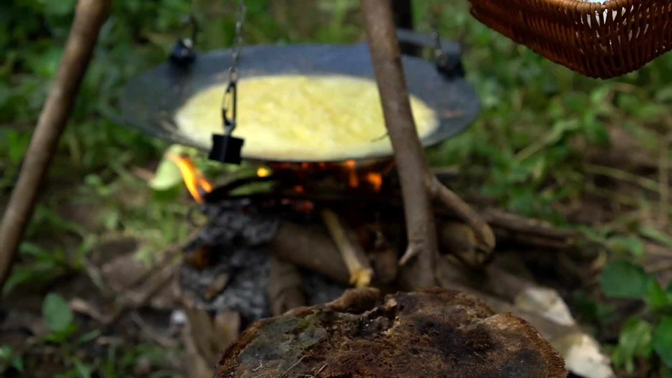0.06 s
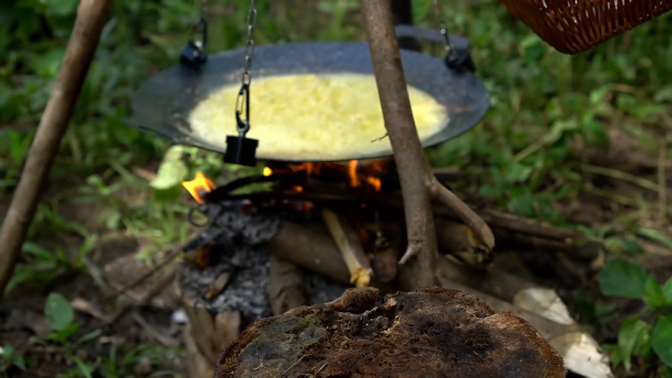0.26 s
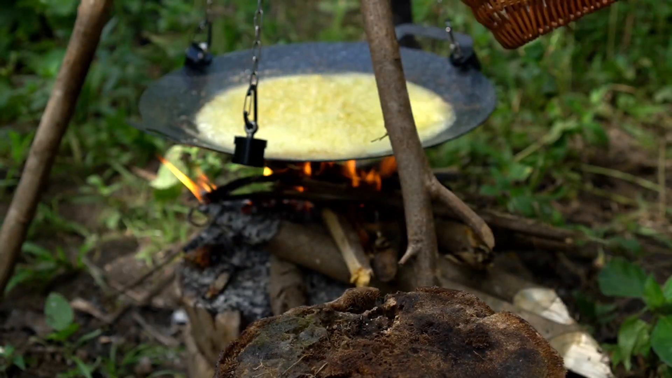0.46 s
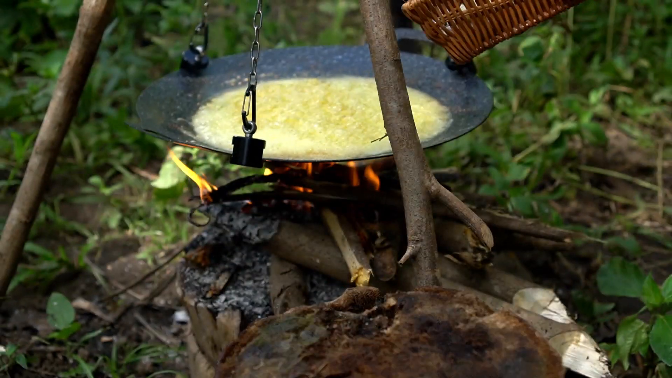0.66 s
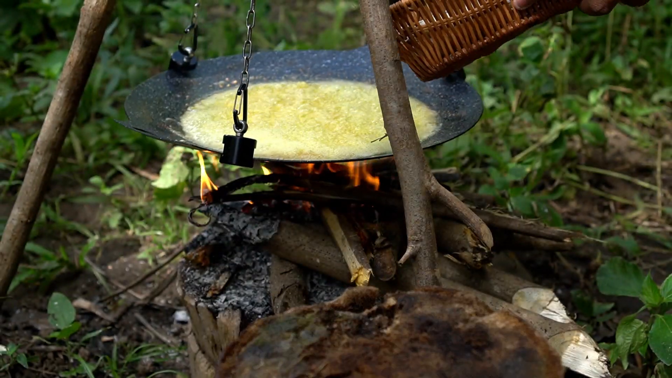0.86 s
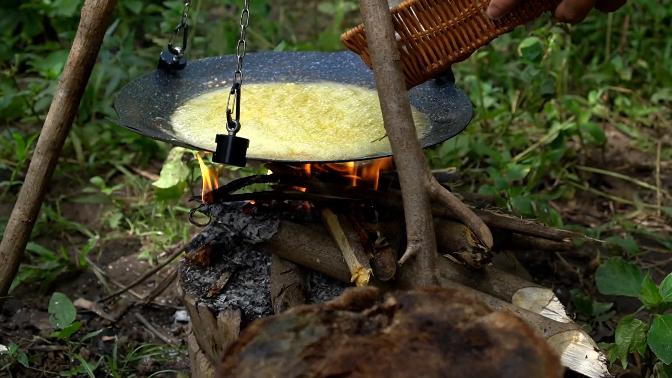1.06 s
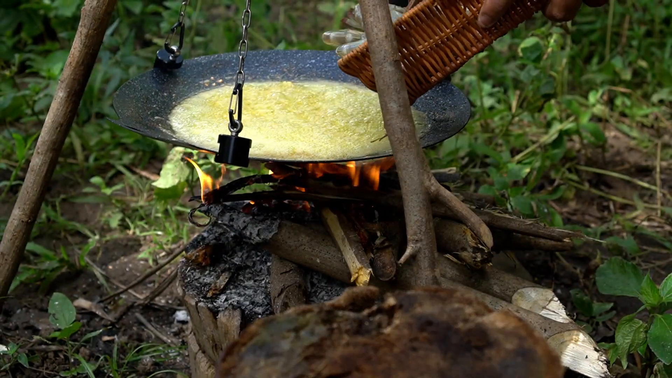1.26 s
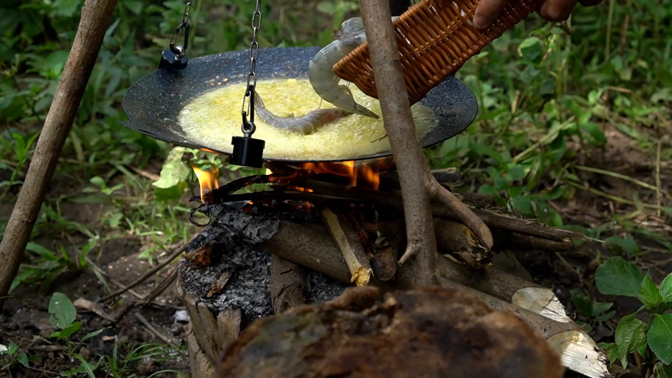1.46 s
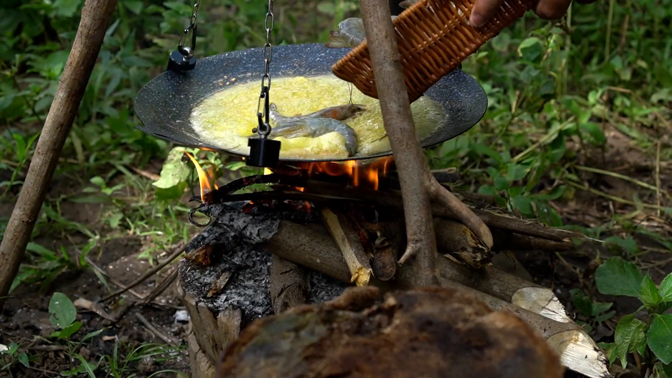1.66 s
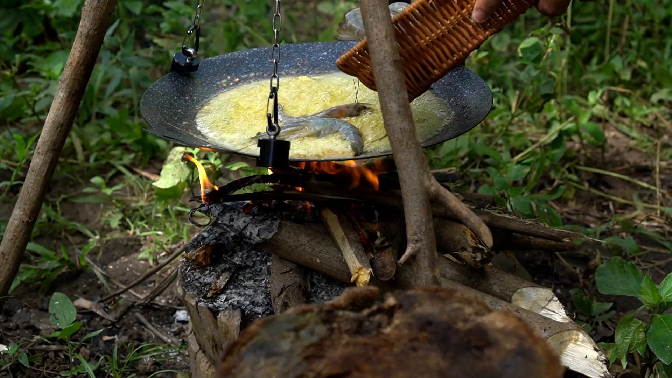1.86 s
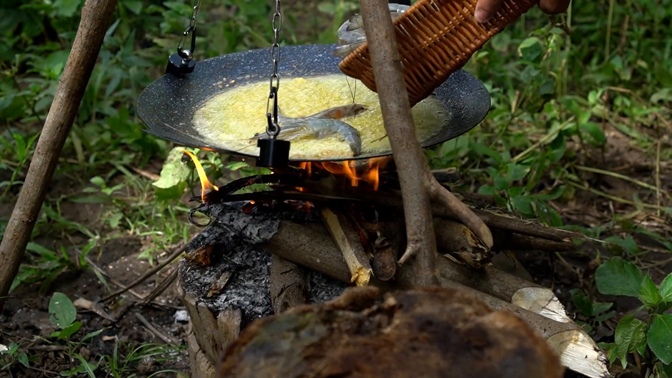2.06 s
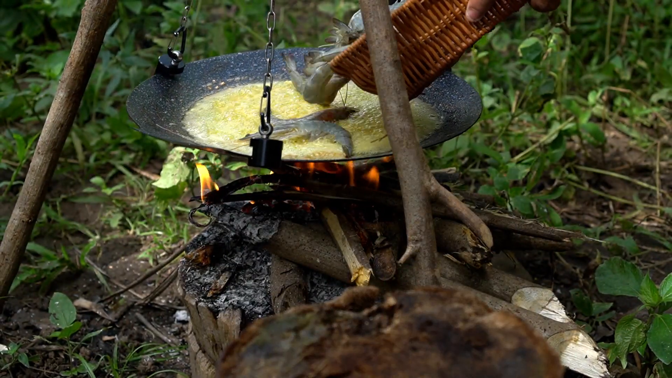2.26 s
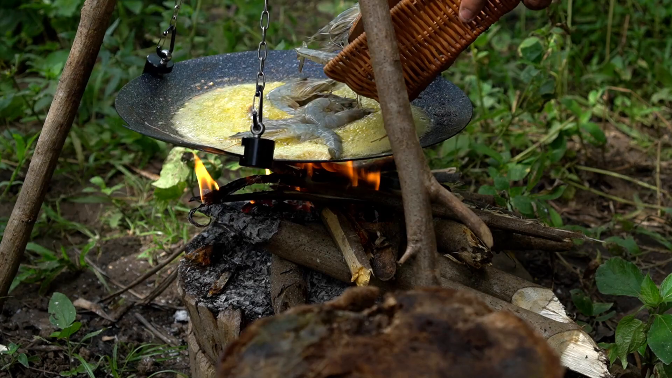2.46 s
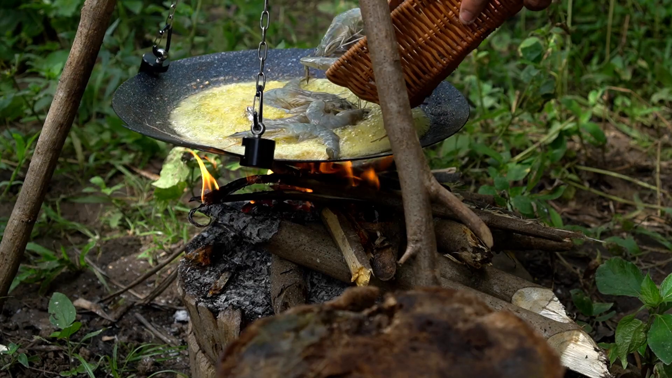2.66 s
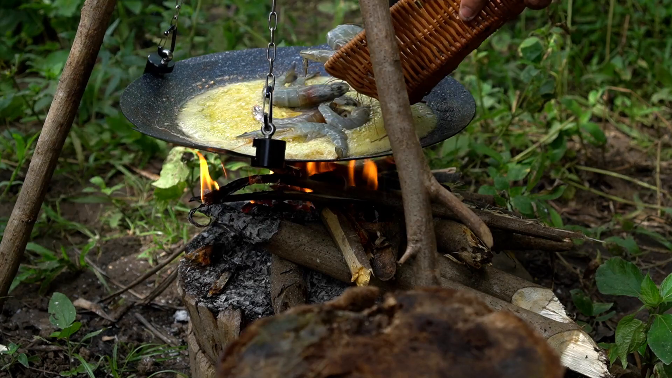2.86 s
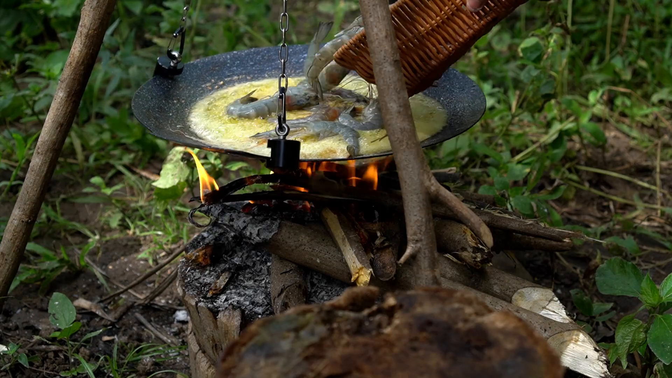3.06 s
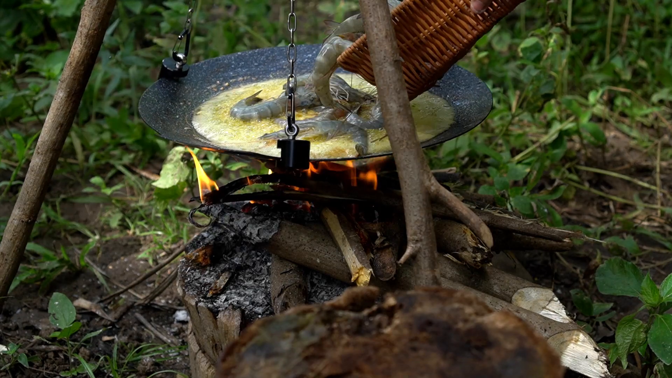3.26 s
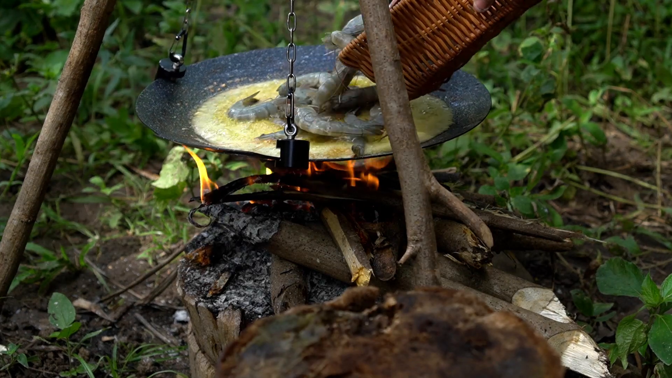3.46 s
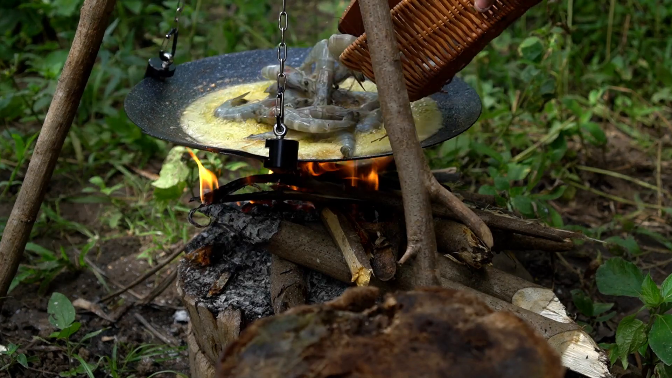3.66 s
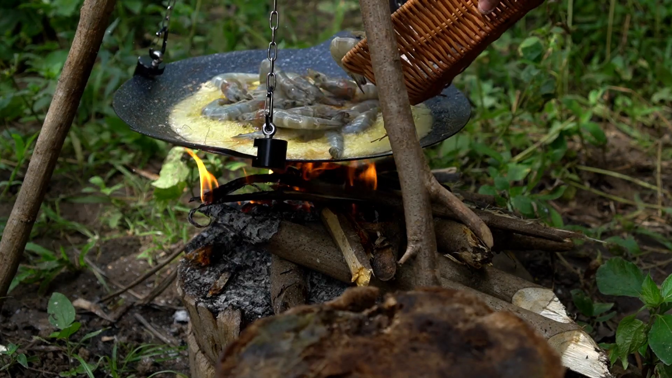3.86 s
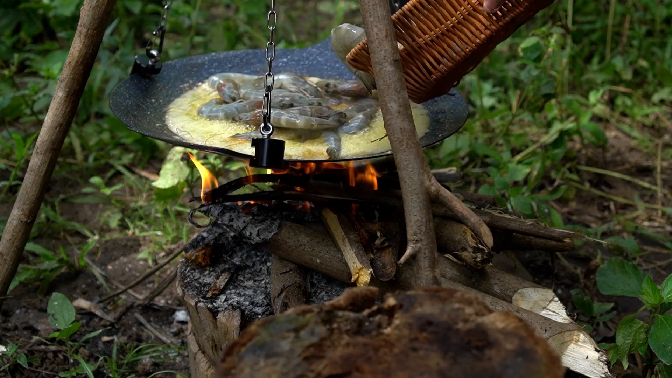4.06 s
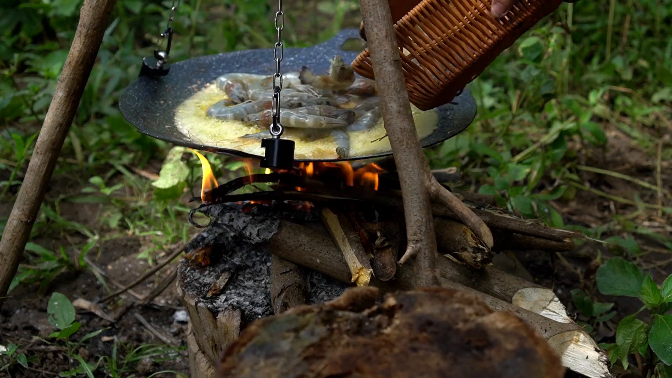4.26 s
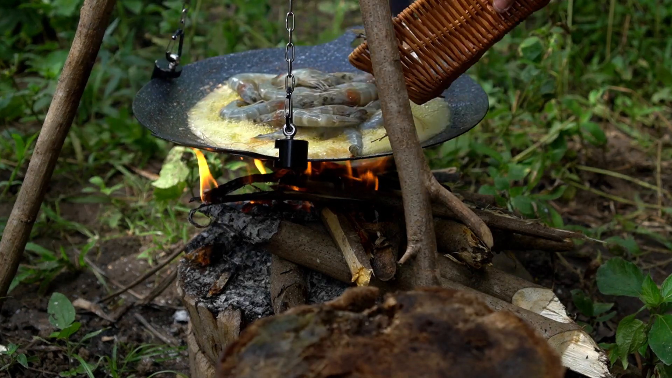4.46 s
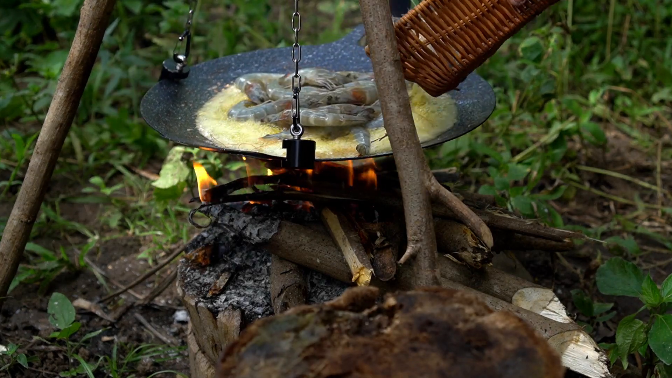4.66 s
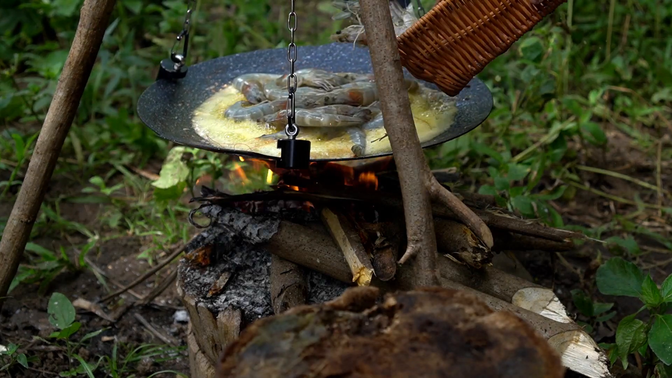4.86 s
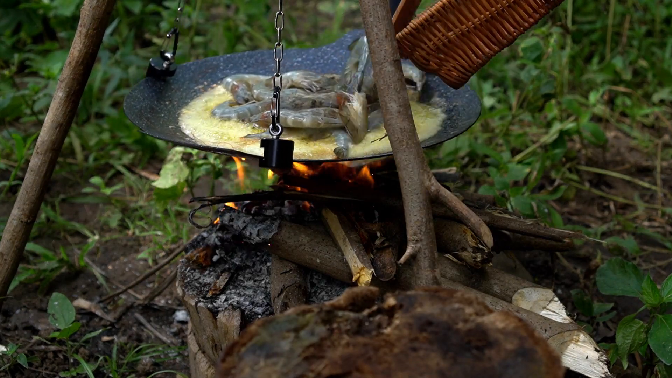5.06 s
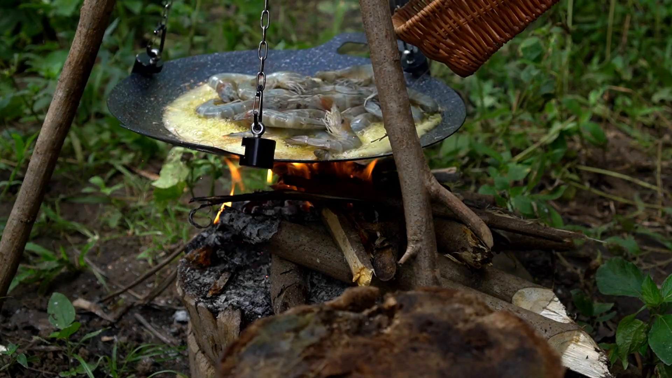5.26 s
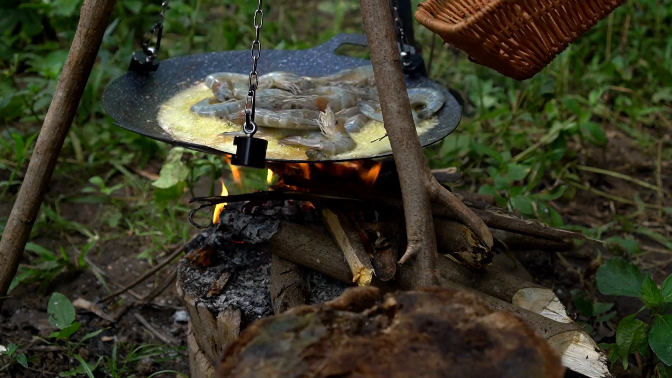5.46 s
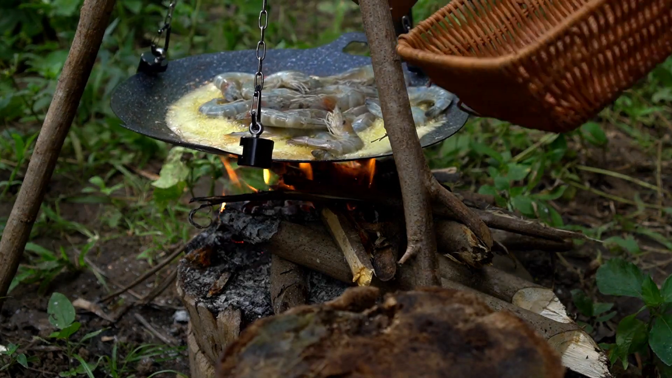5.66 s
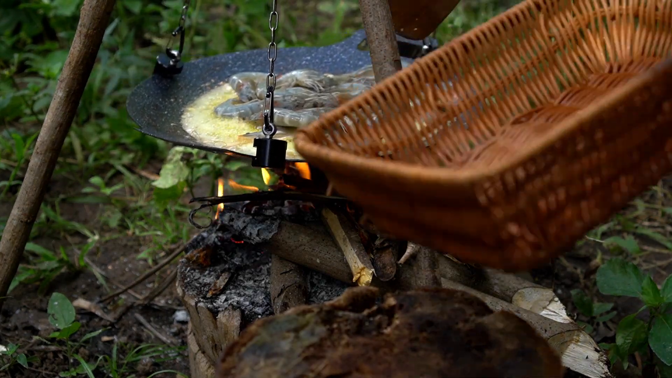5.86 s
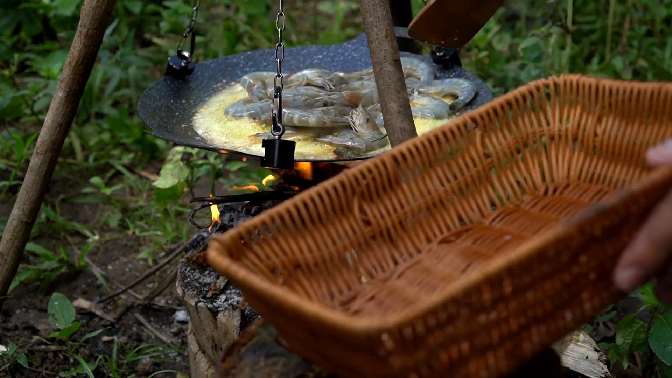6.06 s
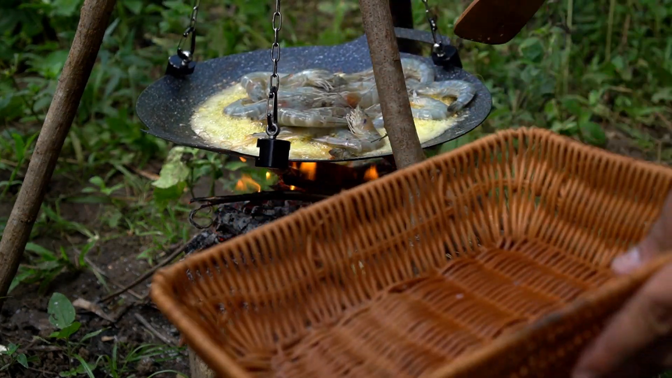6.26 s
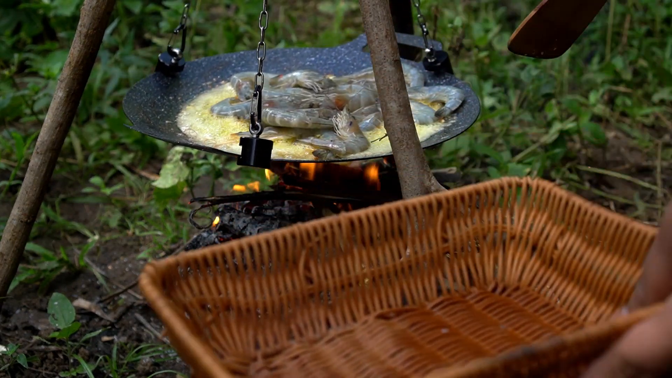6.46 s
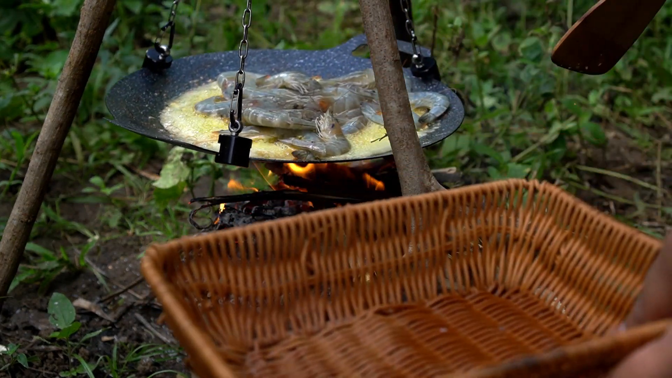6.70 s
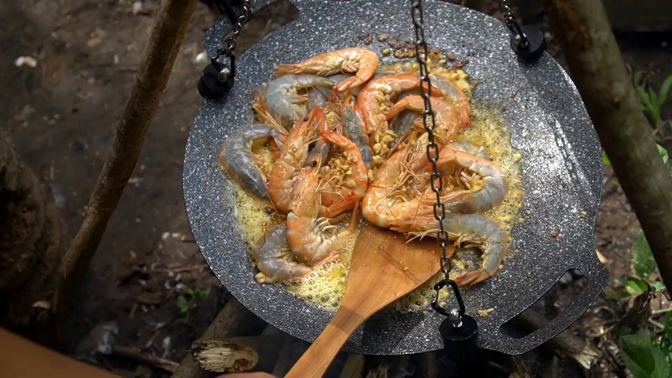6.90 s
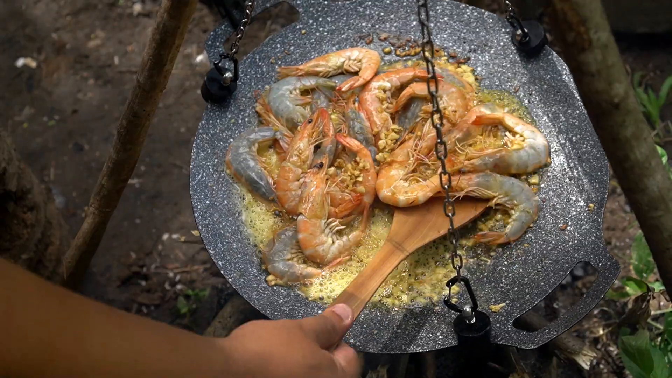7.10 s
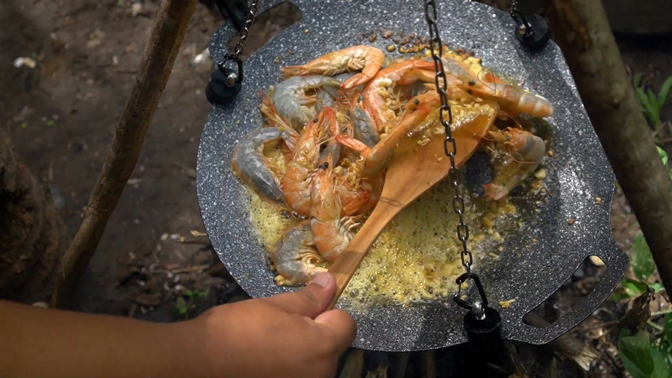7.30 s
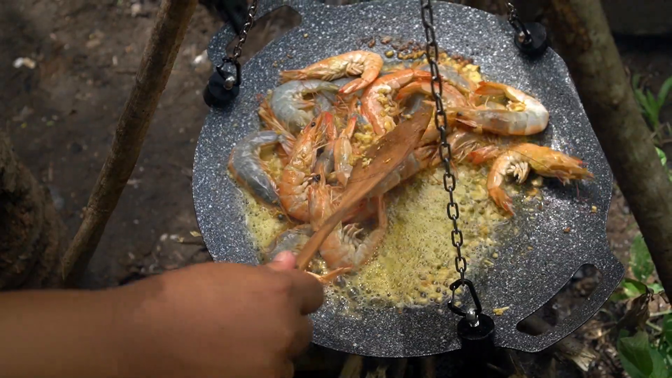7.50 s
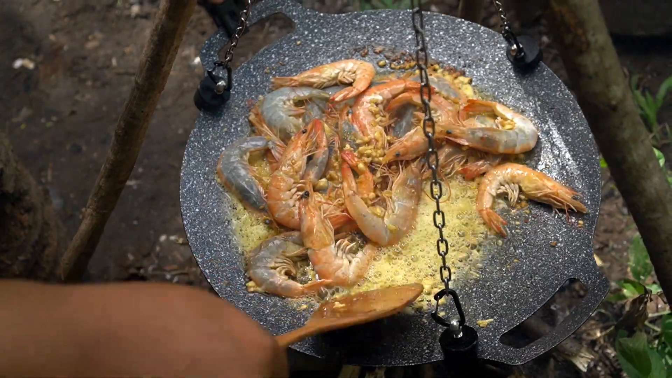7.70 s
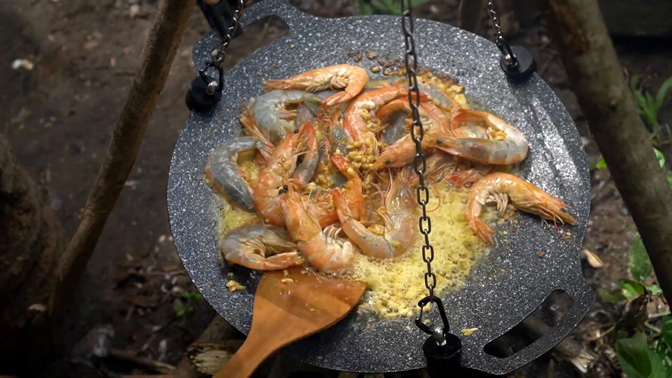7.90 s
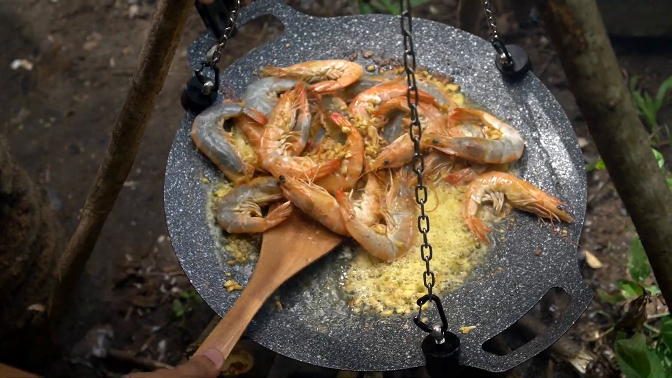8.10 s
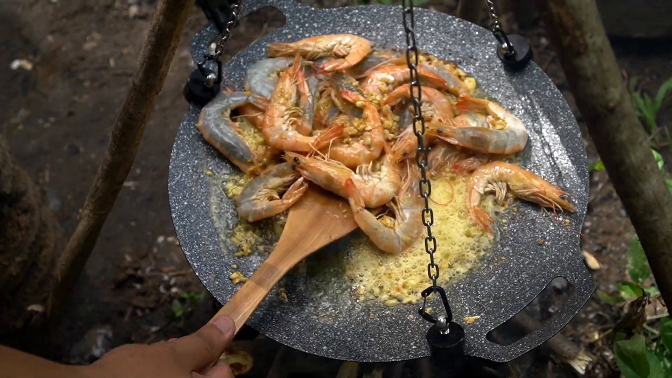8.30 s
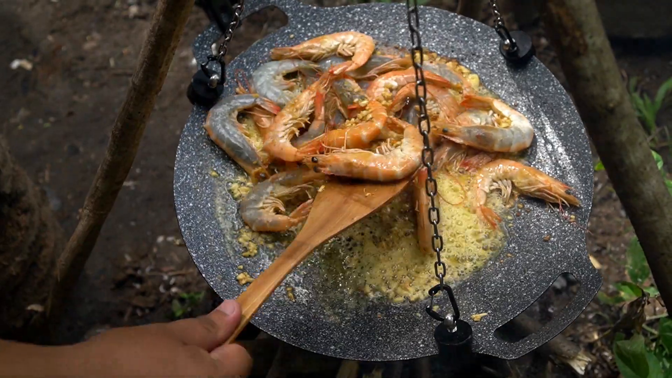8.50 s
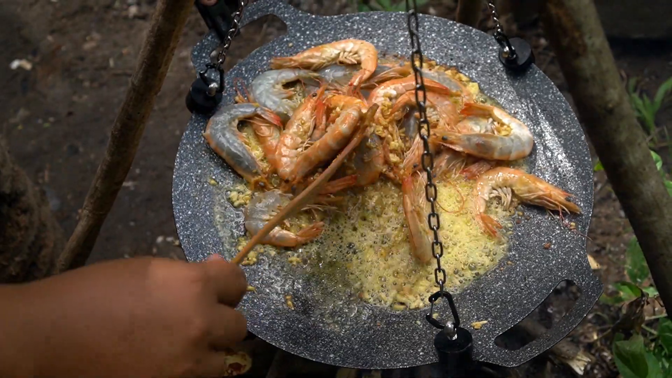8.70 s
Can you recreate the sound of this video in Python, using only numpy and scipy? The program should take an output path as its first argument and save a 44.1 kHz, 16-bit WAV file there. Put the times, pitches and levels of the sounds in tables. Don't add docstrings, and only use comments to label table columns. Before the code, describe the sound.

Butter sizzles steadily in an iron pan over a wood fire; raw shrimp slide in with thuds, loud pops and spitting, and the frying swells.

```python
import sys
import numpy as np
from scipy import signal
from scipy.fft import rfft, irfft
from scipy.io import wavfile
from scipy.ndimage import uniform_filter1d

SR = 44100
rng = np.random.default_rng(int(sys.argv[2]) if len(sys.argv) > 2 else 0)


def nominal_scale(level):
    x = np.asarray(level, float) / 20
    return 10 ** x


def wrap_up_sound(samples):
    columns = np.atleast_2d(samples).T
    tamed = np.clip(columns, -1, 1)
    steps = np.round(tamed * 32767).astype(np.int16)
    wavfile.write(sys.argv[1], SR, steps)


N = 385434

# start_s, vigour_db, bubble coarseness_db
BOIL = [(0.0, -29.5, 0.5), (0.36, -28, 0.5), (0.61, -29.5, -0.5), (1.5, -29, 0.5), (1.97, -25.5, -0.5),
        (2.99, -24.5, 0), (3.87, -22, 0), (4.43, -20.5, 0.5), (4.8, -22.5, 0), (5.1, -16, 1),
        (5.38, -15, 2.5), (6.13, -21, 0), (6.5, -18.5, 0), (6.9, -22.5, -0.5), (7.45, -17, -1.5),
        (7.9, -15.5, 2), (8.4, -13, -1.5), (8.74, -13.5, 0.5)]
# pitch_hz, width_hz, level_db
PAN_MODES = [(1000, 300, -4), (2100, 500, -3), (3500, 600, 0), (5300, 700, -4)]
ABOVE_S, ABOVE_CRACKLE_DB = 6.92, -2.5


def rms_one(x):
    return x / np.sqrt(np.mean(x ** 2) + 1e-20)


def peak_one(x):
    return x / (np.abs(x).max() + 1e-12)


def after(s):
    return np.clip((np.arange(N) / SR - s) / .05, 0, 1)


def in_time(rows):
    s, *columns = np.transpose(rows)
    return [np.interp(np.arange(N) / SR, s, column) for column in columns]


def add(out, s, sound):
    i = round(s * SR)
    out[i:i + len(sound)] += sound[:N - i]


def drift(rate):
    r = np.exp(-40 * np.pi * rate / SR)
    noise = rng.standard_normal(N // 20 + 4002)
    slow = signal.lfilter([1], [1, -2 * r, r * r], noise)[4000:]
    return np.interp(np.arange(N) / 20, np.arange(len(slow)), rms_one(slow))


def resonate(x, hz, width_hz):
    r = np.exp(-np.pi * width_hz / SR)
    feedback = [1, -2 * r * np.cos(2 * np.pi * hz / SR), r * r]
    return signal.lfilter([(1 - r * r) / 2, 0, (r * r - 1) / 2], feedback, x)


def colour(x, spectrum):
    hz, db = np.transpose(spectrum)
    size = 4096
    bins_hz = np.fft.rfftfreq(size, 1 / SR)
    gain_db = np.interp(np.log(bins_hz + 1), np.log(hz), db, -80, -80)
    cepstrum = irfft(np.log(nominal_scale(gain_db)))
    cepstrum[1:size // 2] *= 2
    cepstrum[size // 2 + 1:] = 0
    response = irfft(np.exp(rfft(cepstrum)))
    return rms_one(signal.fftconvolve(x, response)[:N])


def bursts(per_s, spread_db, clump_db):
    sizes = nominal_scale(spread_db * np.minimum(rng.exponential(1, N), 3.8)) * rng.choice([-1, 1], N)
    crowding = nominal_scale(clump_db * (drift(9) + .7 * drift(45)))
    born = rng.random(N) < per_s * crowding / SR
    return rms_one(sizes * born)


def bubbles(clicks, low_hz, high_hz, cycles, count):
    dealt = rng.integers(0, count, N)
    out = np.zeros(N)
    for k, hz in enumerate(np.geomspace(low_hz, high_hz, count)):
        out += resonate(clicks * (dealt == k) + 1e-18, hz, 1.81 * hz / cycles)
    return rms_one(out)


def frying():
    # pitch_hz, level_db per Hz
    sizzle_colour = [(800, -22), (1200, -5), (1600, -1), (2100, -0.5), (2600, -1), (3050, 0), (3520, 2),
                     (4000, -2.5), (4400, -4), (5350, -2.5), (6300, -9), (7500, -23.5), (9500, -37)]
    gurgle_colour = [(290, -50), (500, -10), (660, -2.5), (879, -1), (1010, 2.5), (1250, -1.5), (1600, -12),
                     (2080, -28), (3520, -120)]
    spray_colour = [(3800, -8), (6500, -4), (7600, -6.5), (10000, -9.5), (14000, -12.5), (16500, -20)]
    # pitch_hz, width_hz, share added
    above_bowl = [(2000, 490, 0.24), (1030, 170, -0.23), (730, 210, .3), (3600, 460, 0.15)]
    above = after(ABOVE_S)
    sizzle_db, coarse_db = in_time(BOIL)
    body_db = np.minimum(2, -20 - sizzle_db) + coarse_db
    gurgle_db = -27 + 0.4 * (sizzle_db + body_db + 20.5) + 0.27 * coarse_db - 2 * above
    spray_db = sizzle_db - 12 - 0.64 * coarse_db + 3.5 * above

    shrimp_in_s, plain_per_s, loaded_per_s = 1.5, 4800, 3000
    per_s = plain_per_s + (loaded_per_s - plain_per_s) * after(shrimp_in_s)
    fizz = bursts(per_s, spread_db=2.5, clump_db=1.76)
    hiss = rng.standard_normal(N)
    crackle = bursts(per_s / 14, spread_db=4.5, clump_db=3.0)
    crackle_db = np.clip(sizzle_db + 19.5, -8, 1.5) + ABOVE_CRACKLE_DB * after(ABOVE_S + 0.49)
    crackle = crackle * nominal_scale(crackle_db)

    rings = bubbles(fizz, 1206, 6600, cycles=6.8, count=16)
    rings = rings + 0.41 * bubbles(crackle, 1124, 6800, cycles=11.0, count=8)
    sizzle = colour(rings + 0.2 * crackle + 1.33 * hiss, sizzle_colour)
    body = signal.sosfiltfilt(signal.butter(2, 2900, fs=SR, output="sos"), sizzle)
    sizzle = sizzle + (nominal_scale(body_db) - 1) * body

    droplets = bursts(per_s, spread_db=-0.5, clump_db=1.36)
    spray = colour(0.89 * droplets + 0.5 * crackle + 0.28 * hiss, spray_colour)
    large = bursts(per_s / 5, spread_db=1.0, clump_db=2.5)
    large_rings = bubbles(large, 455, 1810, cycles=6.5, count=8)
    gurgle = colour(large_rings + 0.99 * crackle + 1.83 * hiss, gurgle_colour)

    surge_db = 1.57 * drift(26) * np.clip((sizzle_db + 25.0) / 8, 0, 1)
    surge_db = surge_db * (1 - .4 * after(ABOVE_S + .3))
    boil = nominal_scale(sizzle_db - 0.49 + surge_db) * sizzle + nominal_scale(gurgle_db - 2.22) * gurgle
    bowl = sum(share * resonate(boil, hz, width_hz) for hz, width_hz, share in above_bowl)
    return boil + above * bowl + nominal_scale(spray_db - 0.5 + 1.4 * surge_db) * spray


def burst(noise, hz, splash_ms):
    t = np.arange(len(noise)) / SR
    splash = noise * np.exp(-t / (max(splash_ms, .2) * .0013))
    splash[0] = np.sign(noise[0]) * 5
    bubble = resonate(splash, hz, 0.095 * hz + 150)
    pan = sum(nominal_scale(db) * resonate(splash, mode_hz, width_hz) for mode_hz, width_hz, db in PAN_MODES)
    dull = signal.butter(2, 6800, fs=SR, output="sos")
    return splash, peak_one(signal.sosfilt(dull, bubble + .25 * pan))


def pops():
    # peak_s, peak_db, ring pitch_hz
    pop_rows = [(0.8034, -8, 4740), (1.7039, -2, 2650), (1.711, -3, 2400), (1.9082, -5, 4800),
                (2.2203, -3, 4460), (2.4439, -3, 3940), (2.8471, -7, 1940), (2.8731, -3, 3730),
                (3.1988, -2, 3810), (3.487, -2, 2710), (3.5194, -1, 3530), (3.642, 3, 3500),
                (3.8509, 3, 1890), (3.9237, 0, 3730), (4.0174, -1, 1700), (4.0314, -1, 3320),
                (4.0558, -1, 3140), (4.0644, 1, 1400), (4.4018, 2, 3770), (4.4109, 1, 3660),
                (4.579, 1, 3290), (4.6319, 2, 3730), (4.7532, 5, 650), (4.9307, -3, 1180),
                (5.6609, 0, 3320), (6.1096, -1, 3340), (6.1303, 2, 2650), (6.6542, 0, 1250),
                (6.8661, -3, 850), (7.1941, 1, 3230)]
    out = np.zeros(N)
    high = signal.butter(2, 6500, "high", fs=SR, output="sos")
    for (s, db, hz), noise in zip(pop_rows, rng.standard_normal((len(pop_rows), 1300))):
        splash, ring = burst(noise, hz, splash_ms=1)
        thump_db = -2 - 9 * max(np.log2(hz / 1500), 0)
        thump = peak_one(resonate(splash, 1350, 1000))
        crack = peak_one(signal.sosfilt(high, splash))
        pop = ring + nominal_scale(thump_db) * thump + nominal_scale(-21) * crack
        add(out, s - np.abs(ring).argmax() / SR, nominal_scale(db - 1.2) * pop)
    return out


def spits():
    # peak_s, peak_db, ring pitch_hz
    spit_rows = [(1.4951, -8, 2670), (1.7376, -8, 1100), (2.1046, -7, 5450), (2.1985, -8, 1810),
                 (2.6518, -7, 3400), (2.7847, -5, 4890), (2.821, -6, 3530), (3.1168, -4, 3750),
                 (3.1764, -5, 5210), (3.4082, -3, 3490), (3.466, -5, 1810), (3.801, -4, 1890),
                 (3.9827, -4, 3270), (4.109, -4, 3510), (4.1556, -4, 3640), (4.2429, -4, 3140),
                 (4.3727, -1, 5530), (4.6201, -2, 2410), (7.8206, -1, 1890), (1.8483, -8, 4300),
                 (1.9548, -5, 4460), (6.0517, -2, 4840), (6.2668, -1, 3170), (1.7925, -9, 3300),
                 (6.614, -2, 3750), (6.6373, -3, 3660), (6.9051, -1, 3510), (6.9168, 0, 3680),
                 (6.966, -3, 2760), (7.055, -2, 3600),
                 (2.0047, -10, 4500), (2.1116, -10, 3470), (2.1753, -10, 1060), (2.5075, -8, 3120),
                  (3.0486, -7, 3120), (3.2911, -6, 5120), (3.5846, -7, 1060), (3.6985, -7, 3750),
                  (3.7072, -8, 3600), (3.7277, -7, 1890), (3.7619, -6, 3900), (3.81, -5, 1770),
                  (3.9013, -5, 3770), (4.1895, -5, 3470), (4.3225, -6, 3600), (4.3344, -5, 3360),
                  (4.4199, -4, 3490), (4.5109, -5, 3170), (4.6896, -6, 3250), (4.8339, -6, 3080),
                  (4.8519, -6, 3600), (4.8635, -4, 3230), (4.908, -5, 3600), (4.9605, -4, 5250),
                  (5.0276, -1, 3320)]
    heap_in_s, strays = 5.05, 40
    vigour_db = in_time(BOIL)[0]
    stray_s = rng.uniform(heap_in_s, N / SR - .02, strays)
    stray_hz = rng.choice(np.array(PAN_MODES)[:, 0], strays, p=[0, .15, .7, .15])
    stray_hz = stray_hz * np.exp(rng.normal(0, .07, strays))
    stray_db = -6 + (vigour_db[(stray_s * SR).astype(int)] + 21) + rng.exponential(1, strays)
    stray_db = stray_db + ABOVE_CRACKLE_DB * (stray_s > ABOVE_S)

    out = np.zeros(N)
    rows = spit_rows + list(zip(stray_s, stray_db, stray_hz))
    for (s, db, hz), noise in zip(rows, rng.standard_normal((len(rows), 500))):
        splash, ring = burst(noise, hz, splash_ms=0.53)
        add(out, s - np.abs(ring).argmax() / SR, nominal_scale(db - 1.5) * (ring + .04 * splash))
    return out


def rushes():
    # start_s, length_s, level_db, centre pitch_hz, width_hz
    rush_rows = [
        (0.298, 0.065, -27, 1820, 600),
        (1.702, 0.021, -21.5, 2500, 3000),
        (1.49, .015, -32, 1200, 3000),
        (2.235, .02, -24, 3220, 2000),
        (4.051, 0.01, -23, 3470, 6000),
        (4.409, 0.016, -19.5, 4640, 3830),
        (6.86, 0.054, -22.5, 3480, 3980),
    ]
    out = np.zeros(N)
    crackle = bursts(9000, spread_db=2.5, clump_db=1.0)
    for s, length_s, db, hz, width_hz in rush_rows:
        i, n = round(s * SR), round(length_s * SR)
        shape = np.sin(np.pi * np.linspace(0, 1, n) ** .7) ** .6
        band = resonate(resonate(crackle[i:i + n], hz, width_hz), hz, 2 * width_hz)
        add(out, s, nominal_scale(db) * shape * rms_one(band))
    return out


def snaps():
    # start_s, peak_db, centre pitch_hz
    snap_rows = [(0.803, 2, 7750), (0.9223, -6, 7000), (1.335, -13, 8700), (1.395, -5, 7700),
                 (1.5474, 1, 13200), (1.8133, -11, 7340), (1.8804, -6, 12800), (1.954, 1, 7360),
                 (2.0905, -8, 8400), (2.368, -2, 7540), (2.6644, -4, 12400), (2.783, 8.5, 12300),
                 (2.8574, -3, 7170), (3.6402, 0, 7700), (3.7995, -4, 8000), (3.8493, 7, 8200),
                 (4.0532, -6, 7300), (4.4094, -14, 7000), (4.9584, 6, 7560), (5.015, 1, 7250),
                 (5.05, -4, 8700), (6.1085, -15, 7100), (6.2536, -1, 10800), (6.76, 0, 8350),
                 (6.8718, -3, 11000), (6.915, -6, 11000), (6.9845, -17.5, 8970), (7.1122, 0, 7290),
                 (7.1466, -3, 9000), (7.4041, 3, 7350)]
    lag_s = .0012
    out, t = np.zeros(N), np.arange(500) / SR
    for (s, db, hz), noise in zip(snap_rows, rng.standard_normal((len(snap_rows), len(t)))):
        click = noise * (np.exp(-t / .0005) + .15 * np.exp(-t / .003))
        add(out, s + lag_s, nominal_scale(db - 11.5) * peak_one(resonate(click, hz, 4800)))
    return out


def thuds():
    # start_s, peak_db, pitch_hz, width_hz
    thud_rows = [(1.7, -9, 510, 530), (3.6417, 5.5, 1010, 960), (3.8499, 3.5, 570, 770),
                 (3.851, -5, 128, 158), (4.635, -5, 600, 440), (4.7537, 0, 1150, 640),
                 (4.7535, -4, 610, 320), (4.0178, -2.5, 700, 900), (1.705, -14, 160, 220),
                 (7.8, -21, 180, 170), (4.753, -8, 100, 220), (5.659, -21, 120, 100),
                 (6.9, -10.5, 250, 300)]
    out = np.zeros(N)
    for s, db, hz, width_hz in thud_rows:
        push = np.zeros(1500)
        push[:12] = -np.hanning(12)
        add(out, s, nominal_scale(db) * peak_one(resonate(push, hz, width_hz)))
    return out


def bird():
    # start_s, length_s, start pitch_hz, end pitch_hz, level_db
    trills = [
        (0.199, .037, 4950, 6200, -26),
        (2.284, .036, 5100, 6400, -22.5),
        (2.406, .042, 4700, 5500, -21),
    ]
    warble_hz, warble_depth_hz = 148.3, 600
    out = np.zeros(N)
    for s, length_s, start_hz, end_hz, db in trills:
        t = np.arange(round(length_s * SR)) / SR
        warble = np.sin(2 * np.pi * warble_hz * t)
        hz = start_hz + (end_hz - start_hz) * np.sin(2.4 * t / length_s)
        hz = hz + warble_depth_hz * (warble + 0.43 * drift(330)[:len(t)])
        shape = np.sqrt(np.sin(np.pi * t / length_s)) * (1 - .6 * warble)
        shape = shape * nominal_scale(3 * drift(90)[:len(t)])
        add(out, s, nominal_scale(db) * np.sqrt(2) * shape * np.sin(2 * np.pi * np.cumsum(hz) / SR))
    return out + .25 * np.roll(out, 190) + .15 * np.roll(out, 430)


def fire():
    # pitch_hz, level_db per Hz
    fire_colour = [(47, -32), (80, -4), (231, -4), (280, -2), (339, -4), (399, -1), (700, -4.5),
                   (910, -9.5), (1540, -120)]
    t = np.arange(N) / SR
    above = after(ABOVE_S)
    level_db = -35 - 0.27 * t - 2.5 * above * (1 + 0.74 * (t - ABOVE_S))
    flicker_db = 0.73 * drift(24) + 0.94 * drift(3)
    crackling = (0.98 - 0.38 * above) * bursts(400, spread_db=0.0, clump_db=2.8)
    roar = colour(rng.standard_normal(N) + crackling, fire_colour)
    return nominal_scale(level_db + 1.5 + flicker_db) * roar


def wind():
    # peak_s, length_s, level_db
    gusts = [(0.14, .15, -37), (3.31, 0.29, -34), (4.45, .15, -39), (5.452, 0.19, -31), (5.77, .2, -33),
             (6.163, 0.27, -26), (6.387, 0.1, -24), (6.6, .15, -32), (7.15, 0.47, -35.5), (7.5, 0.092, -42),
             (8.62, 0.29, -25.5), (2.77, .15, -40), (3.85, .1, -34), (2.21, .15, -37)]
    t = np.arange(N) / SR
    push = nominal_scale(-41 + 3 * drift(2.5))
    for s, length_s, db in gusts:
        push = push + nominal_scale(db) * np.exp(-(2 * (t - s) / length_s) ** 2)
    low = signal.butter(2, [20, 50], "band", fs=SR, output="sos")
    rumble = rms_one(signal.sosfilt(low, rng.standard_normal(N)))
    return nominal_scale(-3.5) * push * rumble


def scene():
    fat = frying() + pops() + spits() + rushes() + snaps()
    return (fat + thuds() + bird() + fire() + wind())[None]


def top_cut(x):
    return signal.sosfilt(signal.butter(12, 16690, fs=SR, output="sos"), x)


def record(dry):
    t = np.arange(N) / SR
    loudness = uniform_filter1d(np.abs(dry[0]), size=40)
    over_db = np.maximum(20 * np.log10(loudness + 1e-9) + 9.0, 0)
    release_db = 230
    held_db = np.maximum.accumulate(over_db + release_db * t) - release_db * t
    r = np.exp(-1 / (0.021 * SR))
    x = dry * nominal_scale(-1.3 * signal.lfilter([1 - r], [1, -r], held_db))
    clipped = x / (1 + (np.abs(x) / .88) ** 6) ** (1 / 6)
    below_cutoff = np.fft.rfftfreq(N, 1 / SR) < 15760
    return top_cut(irfft(rfft(clipped) * below_cutoff, N))


dry = scene()
out = record(dry)
wrap_up_sound(out)
```